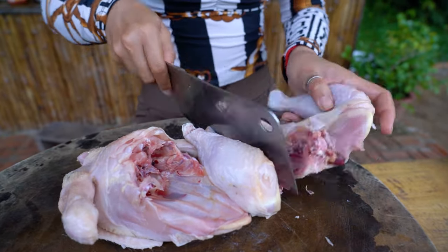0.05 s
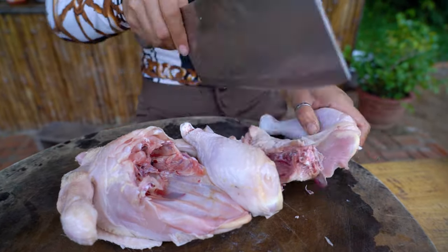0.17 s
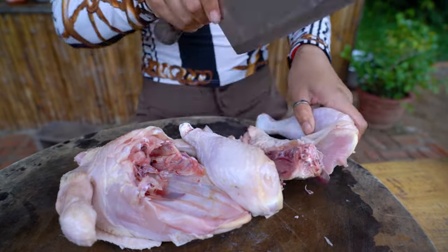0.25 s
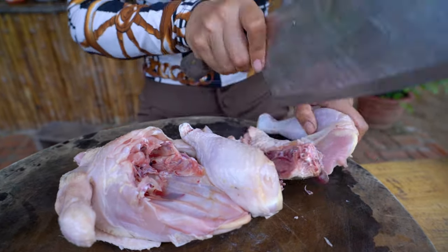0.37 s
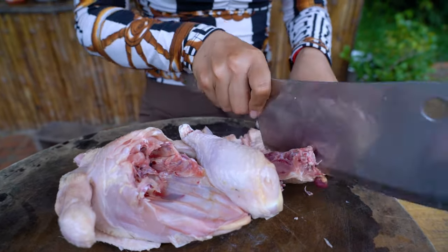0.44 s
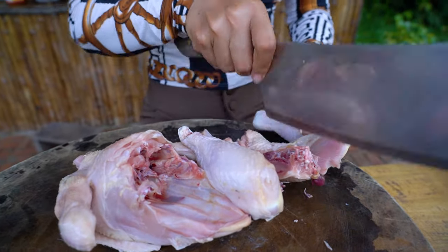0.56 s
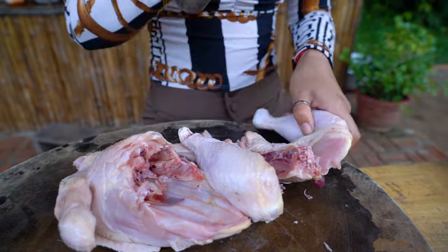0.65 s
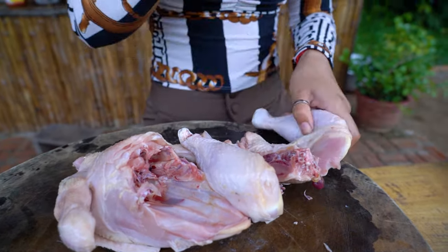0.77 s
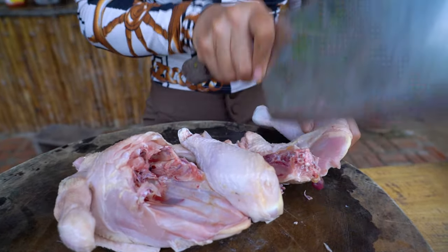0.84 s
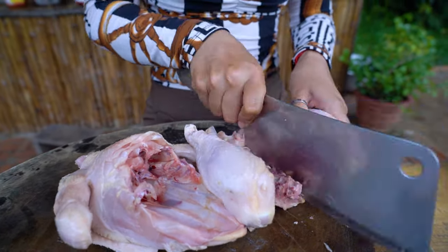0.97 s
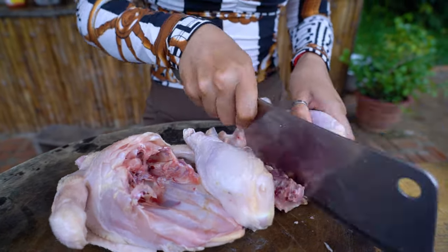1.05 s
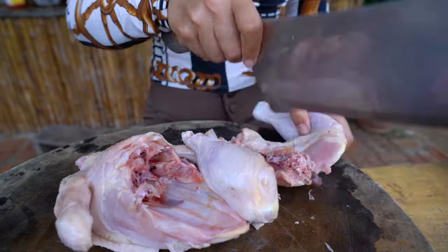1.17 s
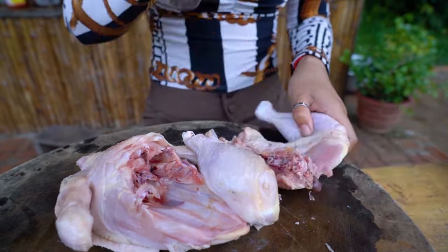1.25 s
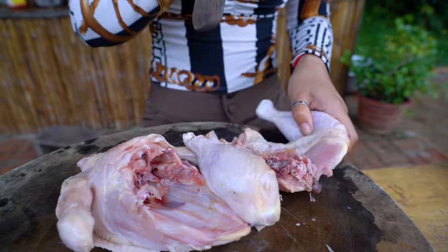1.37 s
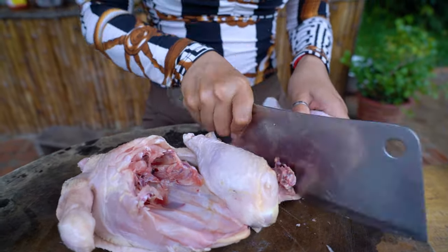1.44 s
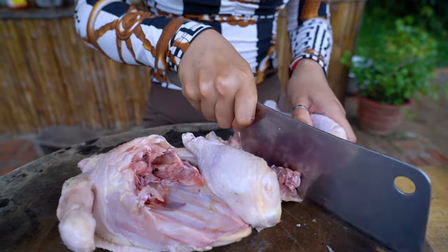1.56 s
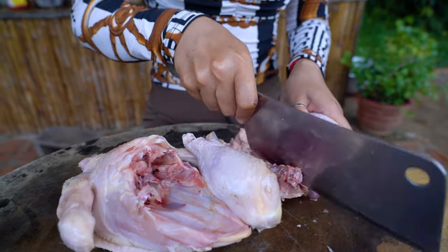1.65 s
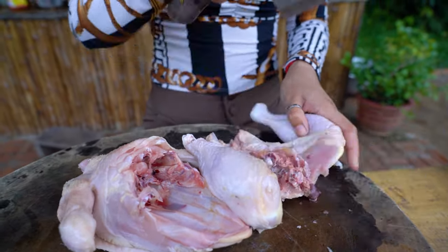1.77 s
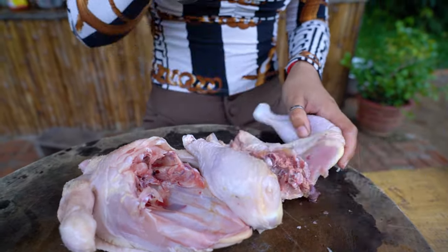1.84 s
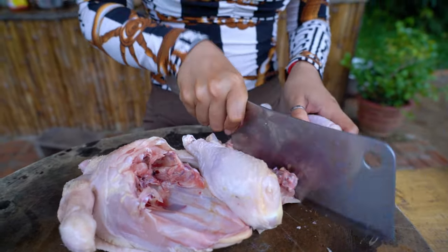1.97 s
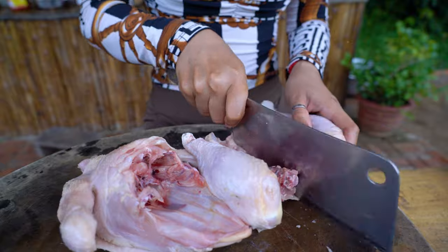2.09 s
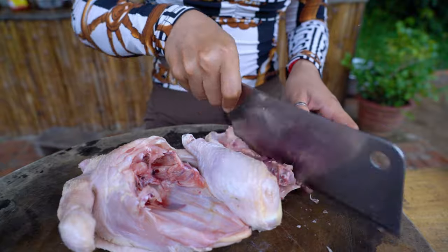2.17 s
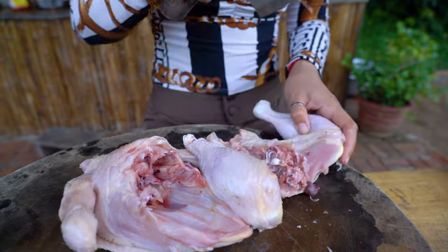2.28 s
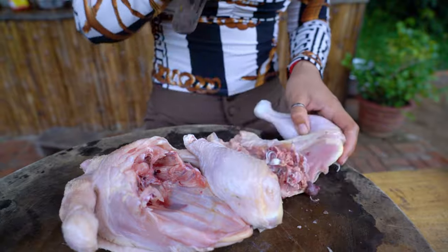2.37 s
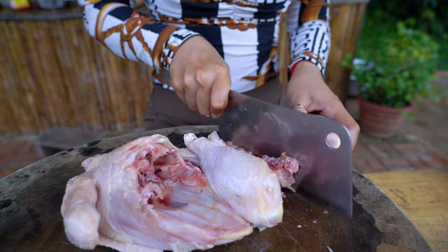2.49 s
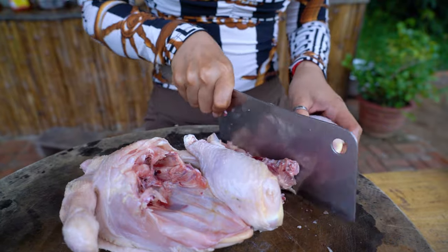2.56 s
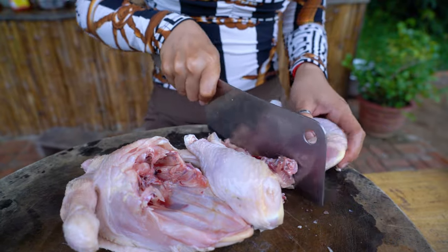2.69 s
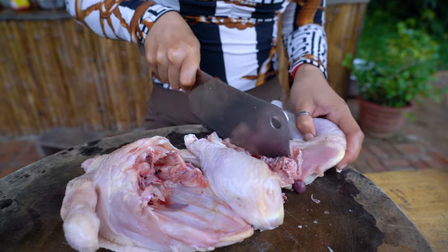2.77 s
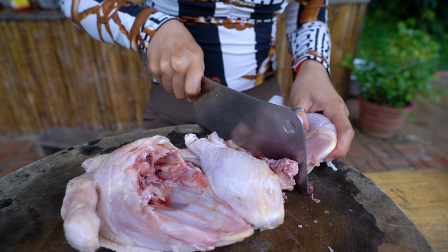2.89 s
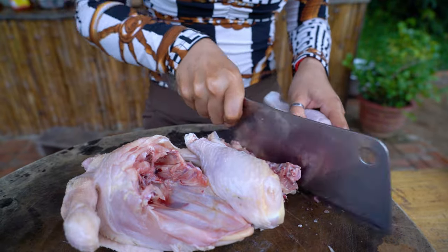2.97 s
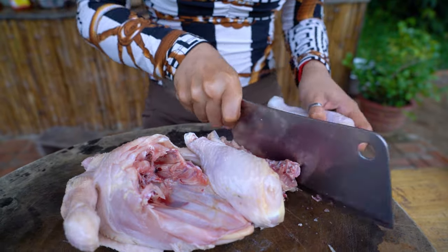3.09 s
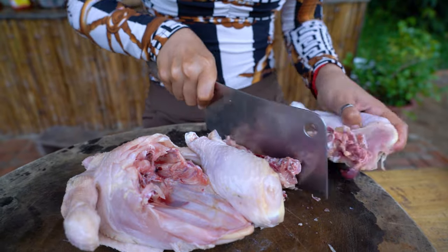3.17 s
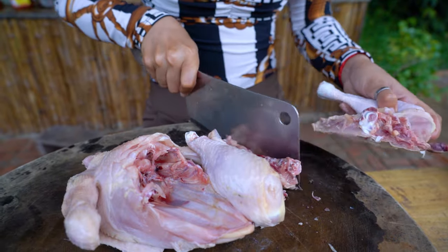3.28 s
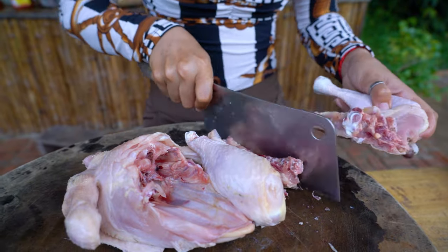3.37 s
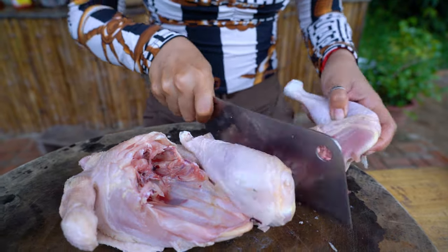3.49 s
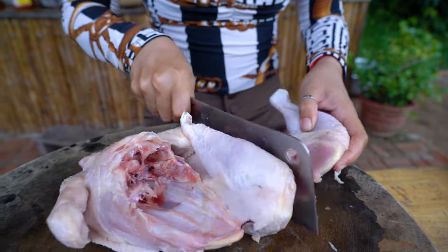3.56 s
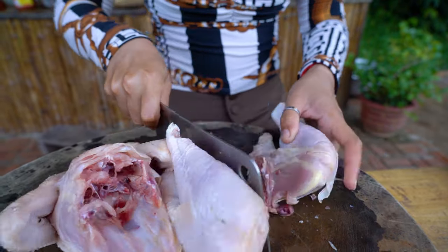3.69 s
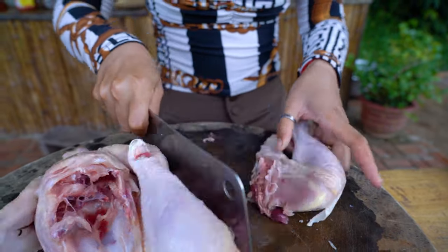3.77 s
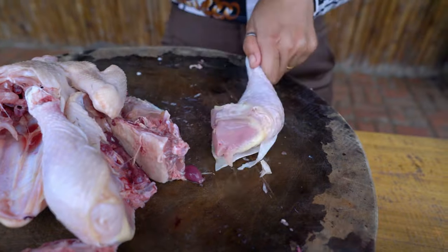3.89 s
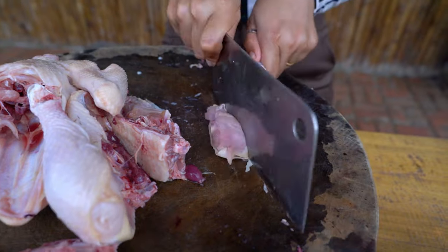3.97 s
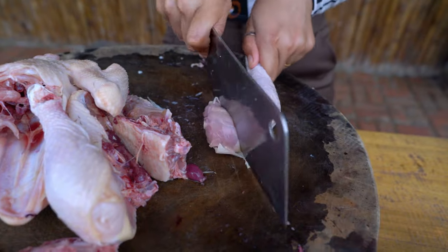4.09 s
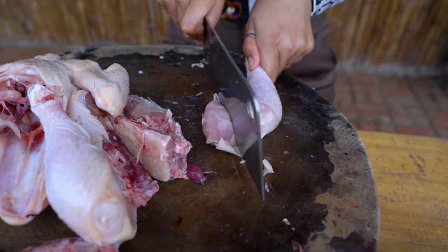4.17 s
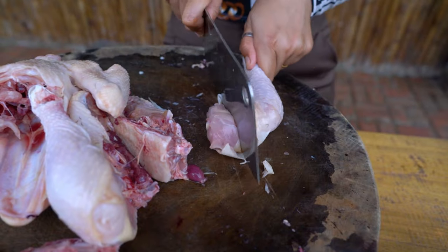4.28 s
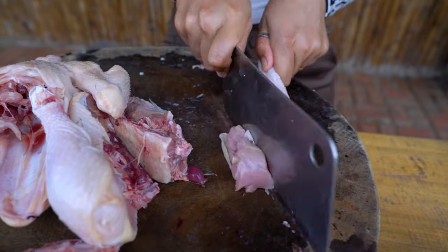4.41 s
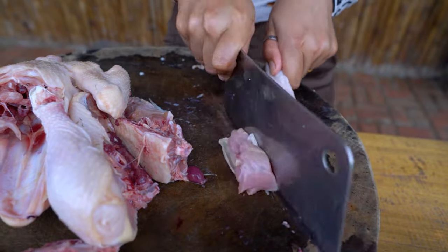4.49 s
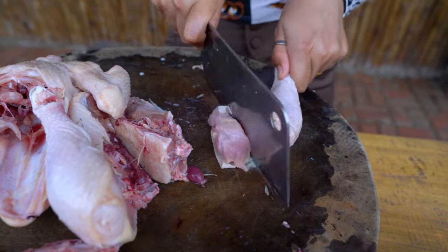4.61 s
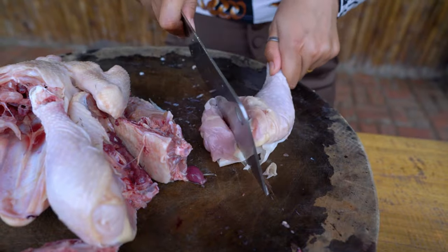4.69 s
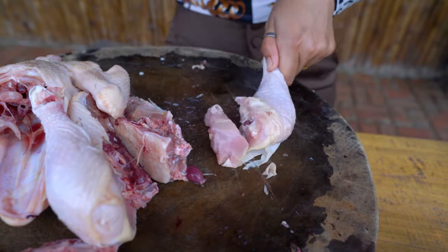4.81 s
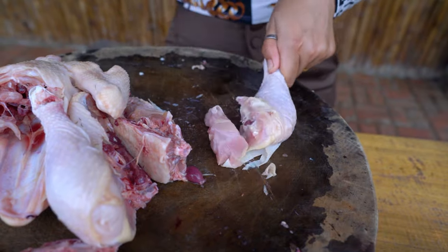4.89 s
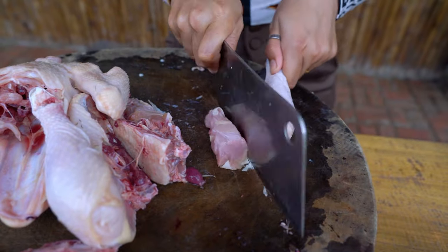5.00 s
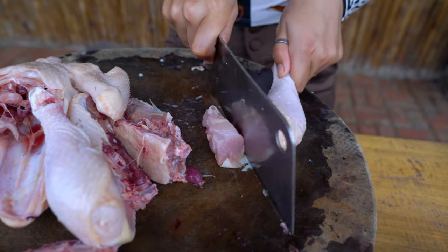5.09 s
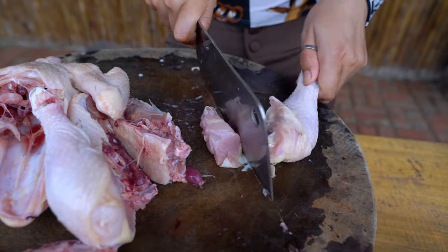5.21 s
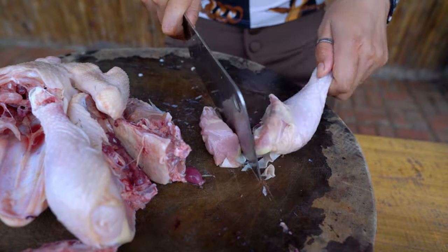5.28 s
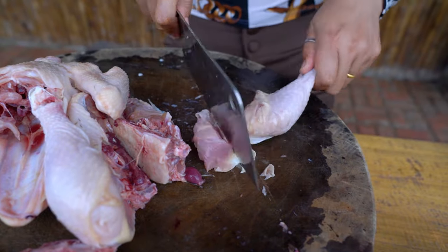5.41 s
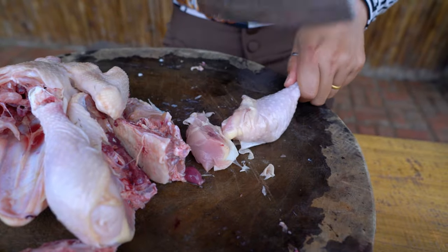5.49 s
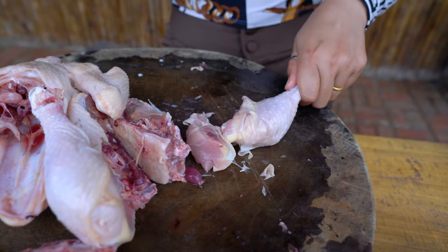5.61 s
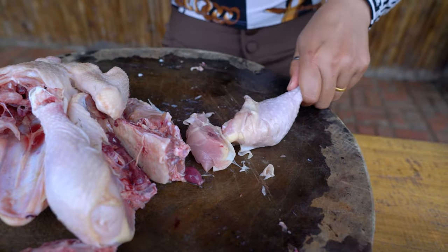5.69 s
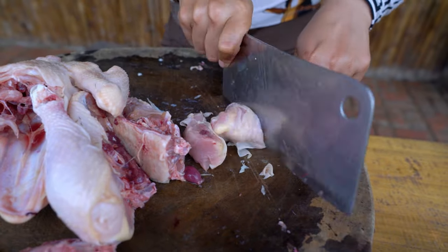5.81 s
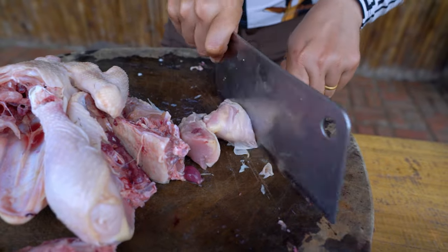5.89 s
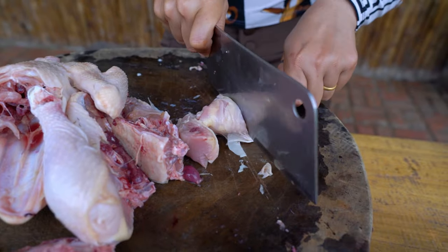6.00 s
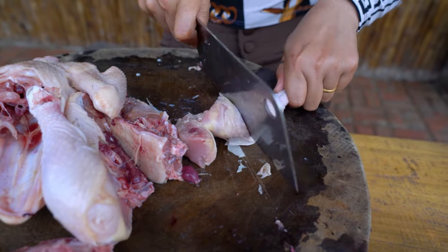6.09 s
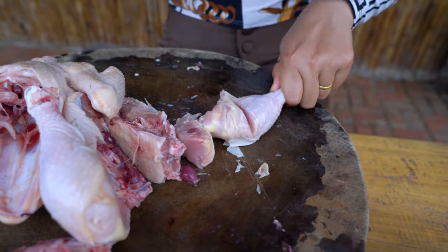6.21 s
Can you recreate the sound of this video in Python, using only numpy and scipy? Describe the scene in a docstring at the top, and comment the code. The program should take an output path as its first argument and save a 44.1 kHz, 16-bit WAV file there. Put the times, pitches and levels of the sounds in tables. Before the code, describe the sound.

Outdoors and close to the microphone, a cleaver strikes raw chicken on a thick wooden block. Five spaced chops crack bone and thud into wood, the block bouncing back with double knocks. Then the blade slices wetly through flesh, followed by three more chops, one very sharp and loud, with short slices between. Low rumble, thin hiss and faint insects lie underneath.

```python
"""Cleaver on a chopping block

A heavy cleaver chops raw chicken on a thick wooden block, outdoors and close to the microphone.
Bone cracks (noise bursts), the edge bites the wood (damped modes and noise) and the block rocks back
onto its bench, mostly twice after a hard blow (force pulses). Between chops the blade slices flesh
(patchy noise); meat, hands and sleeves stir. Underneath: low rumble, thin hiss and distant insects.
"""
import sys
import numpy as np
from scipy import signal
from scipy.fft import rfft, irfft
from scipy.io import wavfile
from scipy.ndimage import uniform_filter1d, minimum_filter1d

SR = 44100
rng = np.random.default_rng(int(sys.argv[2]) if len(sys.argv) > 2 else 0)


def wrap_up_sound(samples):
    """Save the sound to the file named by the first command line argument, as 16-bit audio."""
    columns = np.atleast_2d(samples).T
    # keep every value between -1 and 1, then stretch to whole-number steps
    tamed = np.clip(columns, -1, 1)
    steps = np.round(tamed * 32767).astype(np.int16)
    wavfile.write(sys.argv[1], SR, steps)


N = 275625
ONE_SECOND = np.arange(SR) / SR  # time axis, s


def amp(db):
    """Decibels to gain."""
    return 10 ** (np.asarray(db) / 20)


def unit(x):
    """Scales to rms 1."""
    return x / np.sqrt(np.mean(x ** 2) + 1e-20)


def read(points, hz):
    """Interpolates a table on a log-frequency axis."""
    f, value = np.transpose(points)
    return np.interp(np.log(hz + 1), np.log(f + 1), value)


def add(mix, s, sound):
    """Mixes a sound in, in place, at a time in seconds."""
    part = mix[..., max(round(s * SR), 0):][..., :sound.shape[-1]]
    part += sound[..., :part.shape[-1]]


def convolve(x, response):
    """Passes a signal through a stereo response."""
    return signal.fftconvolve(np.atleast_2d(x), response, axes=1)[:, :N]


def pair(size, side):
    """Stereo white noise with a given share of side signal."""
    mid, wide = rng.standard_normal((2, size))
    return np.array([mid + side * wide, mid - side * wide])


def smooth_noise(size, *widths):
    """Slow random curve of rms 1: noise through two moving averages."""
    slow = rng.standard_normal(size)
    for width in widths:
        slow = uniform_filter1d(slow, size=width)
    return unit(slow)


def grain(size, hold, depth_db):
    """Random gain, redrawn every `hold` samples."""
    return amp(depth_db * np.repeat(rng.standard_normal(size), hold)[:size])


# stereo width, narrow in the bass: f/Hz, side gain/dB
SIDE_GAIN = [(100, -11.5), (250, -10), (500, -3.5), (1000, -4), (3000, 2.5), (16000, 4)]
# excess of the right port, the blade side, at lean 1: f/Hz, level/dB
RIGHT_EXCESS = [(300, -6), (1200, 4), (2500, 7.5), (5000, 6.5), (8000, 17), (16000, 12.5)]


def colour(x, spectrum, lean=0):
    """Gives stereo noise a spectrum, narrows its bass and leans it toward the blade side; rms 1."""
    hz, z = np.fft.rfftfreq(x.shape[-1], 1 / SR), rfft(x)
    mid = z.mean(0)
    z = mid + (z - mid) * amp(read(SIDE_GAIN, hz))
    db = read(spectrum, hz) + lean * np.outer([-.5, .5], read(RIGHT_EXCESS, hz))
    return unit(irfft(z * amp(db), x.shape[-1]))


def tilted(spectrum, db_per_octave):
    """A spectrum made brighter or duller."""
    return [(hz, db + db_per_octave * np.log2(hz)) for hz, db in spectrum]


def fade(x, t60s):
    """Lets every band die at its own speed."""
    hz, t, z = signal.stft(x, SR, nperseg=256)
    decay = amp(-60 * t / read(t60s, hz)[:, None])
    return signal.istft(z * decay, SR, nperseg=256)[1][:, :x.shape[-1]]


def ring(modes, spread=0, scatter=0):
    """Decaying sines; the point of contact scatters their phases, and the two ports differ in phase."""
    skew, start = rng.standard_normal((2, len(modes), 1, 1))
    phase_rad = scatter * start + spread * skew * np.array([[-1], [1]])
    out = 0
    for k, (hz, db, t60_s) in enumerate(modes):
        envelope = amp(db - 60 * ONE_SECOND / t60_s)
        out = out + envelope * np.sin(2 * np.pi * hz * ONE_SECOND + k * np.pi + phase_rad[k])
    return out


def push(s, db, hz):
    """One soft contact, as (start, pulse): a short dip in pressure, narrower when it is harder."""
    t = np.arange(-SR // 50, SR // 50) / SR
    u = (np.pi * hz * t) ** 2
    return s + t[0], amp(db) * (2 * u - 1) * np.exp(-u)


def arch(size, fullness):
    """The speed of a stroke: it swells from rest and returns to rest."""
    return np.sin(np.pi * (np.arange(size) + .5) / size) ** fullness


# modes of block and bench: f/Hz, level/dB, t60/s
BLOCK_MODES = [(163.5, -20.5, 0.36), (212.3, -10.5, 0.38), (245, 1, 0.094), (274.6, -6.5, 0.12),
               (322, -2.5, 0.068), (351, -7, 0.14), (404.8, -0.5, 0.16), (445, -10.5, 0.04),
               (510.4, -8.5, 0.05), (539, -4.5, 0.033), (660.6, -2, 0.22), (647, -21, 0.15),
               (755, -8.5, 0.089), (837, -14.5, 0.45), (822, -35.5, 0.41), (949, -10, 0.11),
               (1097, -12, 0.071), (1174, -17.5, 0.25)]
# colour of the dense modes: f/Hz, density/(dB per Hz)
WOOD_COLOUR = [(60, -55), (150, -1.5), (250, -7), (600, 12), (1000, 5.5), (1700, -18.5), (2400, -15),
               (5000, -18.5), (12000, -19)]
# decay of the dense modes: f/Hz, t60/s
WOOD_DECAY = [(100, 1), (400, 0.076), (1500, 0.25), (8000, 0.15)]


def block(modes_db=-22, dense_db=-15.5, side=0.67):
    """The block's answer to a tap: a few clear modes among many dense ones, drawn anew for each spot."""
    dense = fade(colour(pair(SR, side), WOOD_COLOUR), WOOD_DECAY)
    return amp(modes_db) * ring(BLOCK_MODES, spread=0.36) + amp(dense_db) * dense


def shake(force, direct_db=-1.5, ring_db=-29):
    """A force on the bench is heard directly and as the ring of the block."""
    return amp(direct_db) * force + amp(ring_db) * convolve(force, block())[:, :len(force)]


def stir(rest_db=-63, build_db_per_s=87, swing_die_db_per_s=12.5, lag_s=0.013,
         bump_rumble_db=-20.5, bump_die_db_per_s=101):
    """Rumble strength: it builds toward each blow or bump, peaks just after and dies toward rest."""
    t = np.arange(0, N / SR, .005)
    moves = [(s, db, swing_die_db_per_s) for s, *_, db in BLOWS_AT]
    moves += [(s, db + bump_rumble_db, bump_die_db_per_s) for s, db, _ in BUMPS_AT]
    power = amp(rest_db) ** 2
    for s, db, die_db_per_s in moves:
        since_s = t - s - lag_s
        below_peak_db = np.maximum(-build_db_per_s * since_s, die_db_per_s * since_s)
        power = power + amp(db - below_peak_db) ** 2
    return np.interp(np.arange(N) / SR, t, np.sqrt(power))


# colour of the rumble: f/Hz, density/(dB per Hz)
RUMBLE_COLOUR = [(12, -44), (20, -9.5), (54, 3), (81, 3.5), (183, -4.5), (256, -9), (300, -20),
                 (393, -20.5), (491, -32.5), (767, -35.5), (900, -45), (1170, -70), (1980, -120)]
# colour of the hiss: f/Hz, density/(dB per Hz)
HISS_COLOUR = [(600, 8), (1500, 6), (3000, 0), (6500, -4.5), (10000, -6), (16000, -8.5)]
# shrill of distant insects: f/Hz, density/(dB per Hz)
INSECT_COLOUR = [(6500, -6.5), (7500, -6.5), (8100, 3.5), (8500, 5.5), (9000, 1), (9250, -9), (10200, -33),
                 (10800, -1), (11800, -6), (12600, -16), (16000, -58)]
# hiss and insects over time: t/s, level/dB
AIR_LEVEL = [(0, -55), (2.5, -60), (2.8, -58), (3.85, -64.5), (3.9, -56), (6.25, -55.5)]


def background(rumble_db=3, lumps_db=1.5, insects_db=0):
    """Lumpy low rumble that follows the work, over slowly varying hiss and insects; all shaped noise."""
    lumps = amp(lumps_db * smooth_noise(N, 1500, 1000))
    rumble = unit(colour(pair(N, 1), RUMBLE_COLOUR) * lumps)
    insects = colour(pair(N, 0.72), INSECT_COLOUR, lean=0.37)
    air = colour(pair(N, 1.0), HISS_COLOUR) + amp(insects_db) * insects
    air_db = np.interp(np.arange(N) / SR, *np.transpose(AIR_LEVEL))
    return amp(rumble_db) * stir() * rumble + amp(air_db) * air


# soft contacts of meat and hands: t/s, force level/dB, hardness f/Hz
BUMPS_AT = [(0.044, -18, 103), (.098, -23, 107), (0.24, -19, 135), (0.326, -23.5, 148), (.439, -19.5, 218),
            (0.4784, -16, 188), (.824, -21.5, 367), (0.865, -23, 337), (.874, -15.5, 71.5),
            (2.864, -20, 240), (2.911, -22.5, 140), (3.922, -30, 90), (4.428, -26, 189), (4.87, -27, 111),
            (4.998, -28, 118), (5.629, -18.5, 117)]


def bumps():
    """Meat and hands nudge the block: soft force pulses."""
    force = np.zeros(N)
    for s, db, hardness_hz in BUMPS_AT:
        add(force, *push(s, db, hardness_hz))
    return shake(force)


# sleeves brushing as the arm lifts: start t/s, length/s, level/dB
BRUSHES_AT = [(0.08, 0.17, -53), (.22, 0.27, -48), (0.606, .3, -47)]
# colour of rubbing cloth: f/Hz, density/(dB per Hz)
CLOTH_COLOUR = [(400, -11), (1000, 0), (1400, -4.5), (2000, 2), (2700, -2), (3500, -8), (5500, -13),
                (8000, -12.5), (11000, -14.5), (16000, -31)]


def sleeves(grain_db=2.0, fullness=0.58):
    """Cloth brushes on cloth: grainy noise, as loud as the arm is fast."""
    speed = np.zeros(N)
    for s, length_s, db in BRUSHES_AT:
        add(speed, s, amp(db) * arch(round(length_s * SR), fullness))
    rubbing = pair(N, 0.43) * grain(N, 100, grain_db)
    return speed * colour(rubbing, CLOTH_COLOUR, lean=0.28)


# bone and gristle breaking: t/s, level/dB, length/s, tilt/(dB per octave),
# wet spatter energy relative to the crack/dB
CRACKS_AT = [(0.131, -43.5, 0.0094, 0, -1), (0.4998, -19, 0.0067, 1, -6.5), (0.9437, -29, 0.0024, 4, -20),
             (0.9484, -15.5, 0.0029, 0, -22), (0.9526, -14, 0.0035, -2, -2),
             (1.1603, -19, 0.0015, 15.5, -12), (1.521, -14.5, 0.0084, -0.5, -2.5),
             (1.668, -45, 0.0045, -1.5, 19), (2.0517, -15, 0.00089, -1, -4),
             (2.0557, -16.5, 0.0045, 0, -0.5), (2.064, -14.5, 0.0013, -7, -13),
             (2.5259, -15, 0.006, 0, -16), (2.534, -23.5, 0.0022, -4, 8.5),
             (3.7947, -31.5, 0.00099, -0.5, 1), (4.0019, -29, 0.003, 3, -20),
             (4.004, -13.5, 0.005, 1, -2.5), (4.0782, -15, 0.0013, 8.5, -5), (5.086, -4, 0.0016, -3, -4.5),
             (5.8459, -28, 0.0015, -2, -20), (5.8475, -16, 0.0058, 2, -1), (6.042, -29.5, 0.001, 2.5, -3)]
# colour before tilt: f/Hz, density/(dB per Hz)
BONE_COLOUR = [(200, 0), (800, 3), (1550, 11.5), (2100, 7.5), (2900, 5), (6500, 2), (9500, -1.5),
               (13000, -8), (16000, -12)]


def cracks(grain_db=3, after_s=0.023, side=0.69, spatter_side=0.73):
    """Each break is a tight cluster of tiny fractures with a wet spatter that dies exponentially."""
    out, t = np.zeros((2, N)), ONE_SECOND[:SR // 6]
    for s, db, length_s, tilt, after_db in CRACKS_AT:
        spectrum = tilted(BONE_COLOUR, tilt)
        fractures = pair(len(t), side) * grain(len(t), 10, grain_db)
        burst = colour(fractures, spectrum, lean=.8) / (1 + (t / length_s) ** 8)
        spatter = colour(pair(len(t), spatter_side), spectrum, lean=0.27)
        spatter = spatter * np.sqrt(length_s / after_s) * np.exp(-t / after_s)
        add(out, s, amp(db) * (burst + amp(after_db) * spatter))
    return out


# edge reaching the block: t/s, wood level/dB, hardness f/Hz, blade ring level/dB,
# pitch the blade favours f/Hz, share of ring time the meat leaves, swing rumble level/dB
BLOWS_AT = [(0.4979, -20.5, 2000, -8.5, 1560, 0.19, -36), (0.953, -10, 780, -3, 2200, 0.17, -34.5),
            (1.526, 4, 1030, -12, 1500, 0.16, -41), (2.0567, 7, 1030, -16, 1500, 0.99, -41),
            (2.5334, -3, 1460, -9, 3130, 0.71, -42.5), (4.008, 3.5, 840, -12.5, 1600, 0.3, -38.5),
            (5.086, 12, 2000, -3, 1550, 0.8, -35.5), (5.85, -13.5, 1200, -3.5, 3100, 0.076, -36.5)]
# modes of the free blade: f/Hz, level/dB, t60/s
BLADE_MODES = [(1490, -7, .12), (1523, -7, .19), (1630, -8, .15), (1675, -4, .17), (1722, -3, .17),
               (1765, -5, .16), (1967, -9, .11), (2040, -8, .08), (2621, -16, .14), (3086, -14, .17),
               (3270, -11, .16), (3400, -14, .15), (3540, -14, .15), (3659, -15, .16)]


def blows(blade_db=-7, focus_db=9, thud_db=-21, thud_hz=190, cushion_s=0.0034):
    """The edge thuds into meat, then strikes wood; the point of contact picks the blade modes that ring."""
    out = np.zeros((2, N))
    for s, wood_db, hardness_hz, ring_db, favoured_hz, freedom, _ in BLOWS_AT:
        knock = signal.lfilter(*signal.butter(1, hardness_hz, fs=SR), block())
        modes = [(hz, db - focus_db * np.log2(hz / favoured_hz) ** 2, freedom * t60_s)
                 for hz, db, t60_s in BLADE_MODES]
        steel = ring(modes, spread=0.82, scatter=1.4)
        add(out, s, amp(wood_db) * knock + amp(ring_db + blade_db) * steel)
        add(out, *push(s - cushion_s, thud_db, thud_hz))
    return out


# block dropping back on the bench: t/s, level/dB, rim hardness f/Hz, relative clack level/dB
ROCKS_AT = [(1.0023, -1, 444, -29), (1.0527, -1, 470, -22), (1.5818, -0.5, 457, -19.5),
            (1.6275, -2.5, 440, -31), (2.1131, 0, 430, -24), (2.1583, -3.5, 413, -28.5),
            (2.5971, 2, 485, -32), (2.6842, -4, 478, -24.5), (4.048, -4, 544, -22),
            (4.0946, -8.5, 420, -29), (5.123, -3.5, 460, -15), (5.8909, -3, 526, -22.5),
            (5.941, -7.5, 526, -24)]
# clack of wood on wood: f/Hz, density/(dB per Hz)
CLACK_COLOUR = [(200, 0), (600, -4), (1050, 0), (1500, -10), (2500, -25.5), (4000, -42), (16000, -96)]


def rocking(gap_s=0.003857, rim_db=-8.0, flat_hz=285, settle_db=-10, loss_db=2, grit_db=-17,
            clack_rise_s=0.0011, clack_s=.02, count=3):
    """The block lands on its rim with a clack, slaps down flat and chatters to rest."""
    out, lead_s, t = np.zeros((2, N)), .02, ONE_SECOND[:SR // 6]
    for s, db, rim_hz, clack_db in ROCKS_AT:
        force = np.zeros(SR)
        add(force, *push(lead_s, rim_db, rim_hz))
        add(force, *push(lead_s, grit_db, 1.7 * rim_hz))  # grit under the rim adds a harder edge
        add(force, *push(lead_s + gap_s, 0, flat_hz))
        for k, late in enumerate(rng.normal(0, 0.12, count)):
            chatter_s = lead_s + (k + 2 + late) * gap_s
            add(force, *push(chatter_s, settle_db - k * loss_db, 0.71 * rim_hz))
        add(out, s - lead_s, amp(db) * shake(force))
        envelope = np.minimum(t / clack_rise_s, 1) * np.exp(-t / clack_s)
        add(out, s, amp(db + clack_db) * colour(pair(len(t), 1.0), CLACK_COLOUR) * envelope)
    return out


# strokes of the blade through flesh: start t/s, length/s, level/dB, tilt/(dB per octave),
# song of the steel relative to the scrape/dB
SLICES_AT = [(2.707, 0.22, -48.5, -1, -13), (2.93, 0.18, -36, 0, -29), (3.136, .21, -39.5, 1.5, -31),
             (3.36, 0.22, -46, -0.5, -32), (3.499, 0.2, -46.5, -1, -6), (3.678, .16, -55, 0, -4),
             (4.19, .16, -48, 1, -13), (4.374, .17, -38.5, 0.3, -10), (4.587, 0.16, -48.5, 1.5, -16),
             (5.191, .17, -50, 3, -21), (5.745, 0.11, -56, 9, -25), (6.055, 0.13, -46.5, 1.5, -18),
             (6.159, 0.048, -42.5, 2, 0.5)]
# colour before tilt: f/Hz, density/(dB per Hz)
FLESH_COLOUR = [(180, -13), (300, -8), (749, -7), (1040, -15.5), (1210, -9.5), (1810, -14), (1970, -15.5),
                (3130, -16), (3950, -16.5), (7440, -20), (16000, -33.5)]


def slicing(clump_db=2, grain_db=1.5, patchy_db=5, side=0.47, fullness=1.19, snaps_per_s=80, snap_db=16.5):
    """Fibres tear and snap under the edge; narrow resonances come and go, and the blade sings faintly."""
    out, size = np.zeros((2, N)), SR // 3
    blade = ring(BLADE_MODES, spread=0.38)[:, :size]
    for s, length_s, db, tilt, steel_db in SLICES_AT:
        tearing = pair(size, side) * grain(size, 40, grain_db)
        snapping = rng.random(size) < snaps_per_s / SR
        tearing = tearing + amp(snap_db) * pair(size, side) * snapping
        z = signal.stft(tearing, nperseg=1024, noverlap=768)[2]
        patches = rng.standard_normal(z.shape[1:])
        patches = uniform_filter1d(patches, size=3, axis=0)  # across frequency
        patches = unit(uniform_filter1d(patches, size=10, axis=1))  # across time
        z = z * amp(patchy_db * patches)
        tearing = signal.istft(z, nperseg=1024, noverlap=768)[1][:, :size]
        steel = unit(convolve(tearing[0], blade)[:, :size])
        scrape = colour(tearing, tilted(FLESH_COLOUR, tilt), lean=0.65) + amp(steel_db) * steel
        scrape = scrape * amp(clump_db * smooth_noise(size, 300, 200))
        speed = arch(round(length_s * SR), fullness)
        add(out, s, amp(db) * speed * unit(scrape[:, -len(speed):]))
    return out


# decay of the yard: f/Hz, t60/s
YARD_DECAY = [(150, 0.98), (500, 0.67), (1500, 0.76), (4000, 0.52), (9000, 0.11), (15000, 0.7)]


def yard(x, wet_db=-22, rise_s=0.0077):
    """Fence and paving scatter a faint tail: convolution with decaying noise."""
    tail = fade(pair(SR, 0.1), YARD_DECAY) * (1 - np.exp(-ONE_SECOND / rise_s))
    return amp(wet_db) * convolve(x, tail / np.linalg.norm(tail[0]))


def scene():
    """All the work at the block, with its echo and the background."""
    work = bumps() + sleeves() + cracks() + blows() + rocking() + slicing()
    return background() + work + yard(work)


def limit(x, ceiling_db=-5, recovery_db_per_s=220):
    """A fast limiter holds the peaks and recovers at a steady rate; what slips past is rounded off."""
    over_db = np.maximum(20 * np.log10(abs(x.mean(0)) + 1e-9) - ceiling_db, 0)
    over_db = -minimum_filter1d(-over_db, size=128)  # running maximum
    fall_db = np.arange(N) * recovery_db_per_s / SR
    cut_db = np.maximum.accumulate(over_db + fall_db) - fall_db
    cut_db = uniform_filter1d(uniform_filter1d(cut_db, size=64), size=64)
    held = x / amp(cut_db)
    return held / (1 + (held / .85) ** 12) ** (1 / 12)


def record(dry, edge_hz=16300):
    """The limiter, then a linear-phase low-pass as band limit."""
    lowpass = signal.firwin(255, edge_hz, window=("kaiser", 9), fs=SR)
    return signal.oaconvolve(limit(dry), lowpass[None], "same")


dry = scene()
out = record(dry)
wrap_up_sound(out)
```